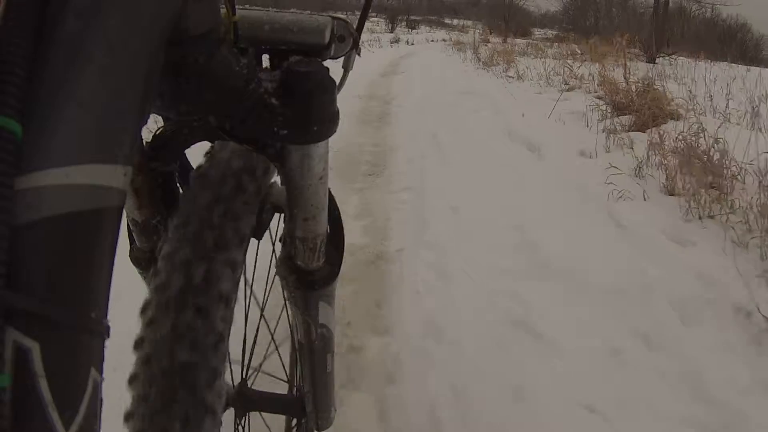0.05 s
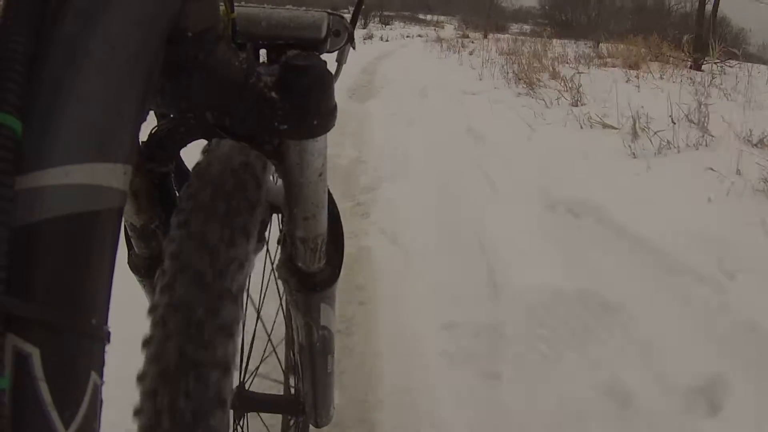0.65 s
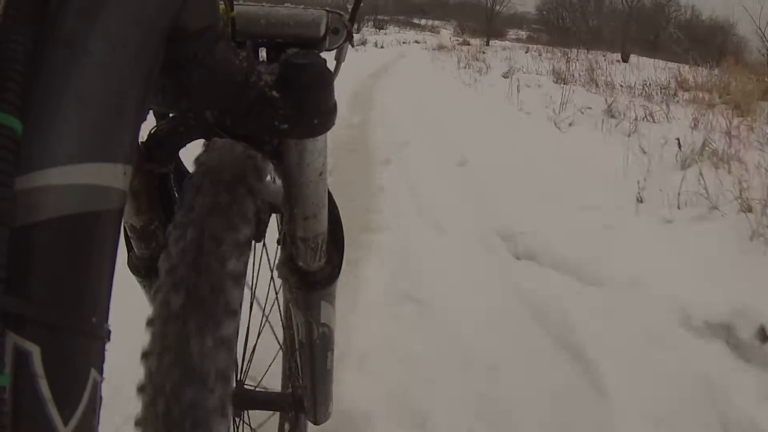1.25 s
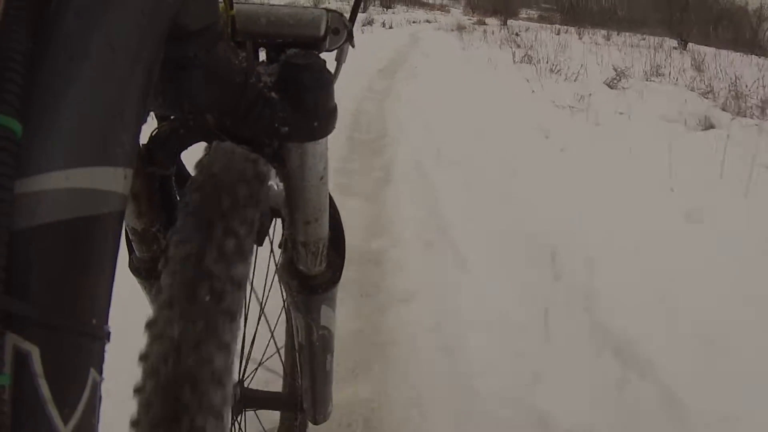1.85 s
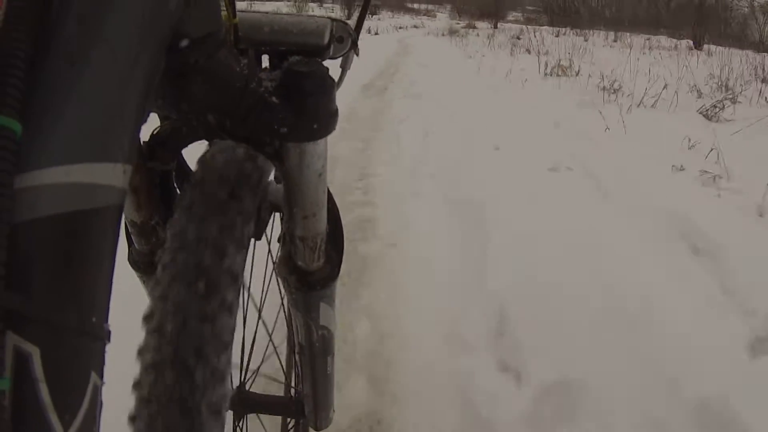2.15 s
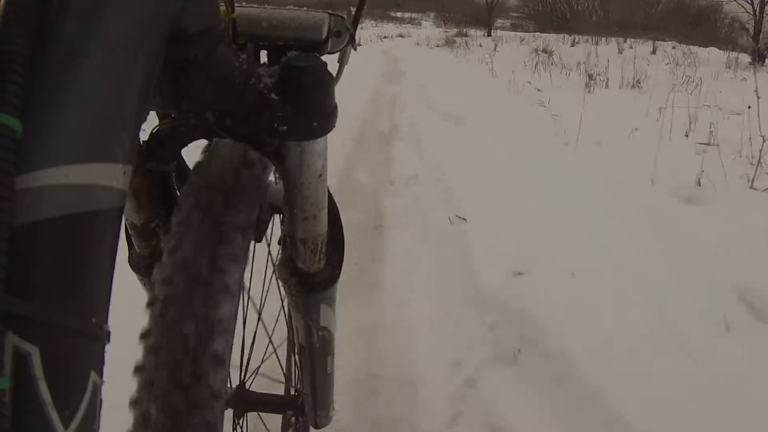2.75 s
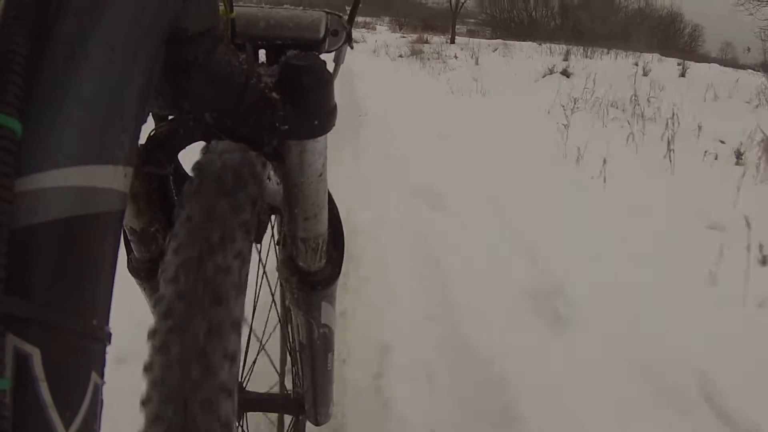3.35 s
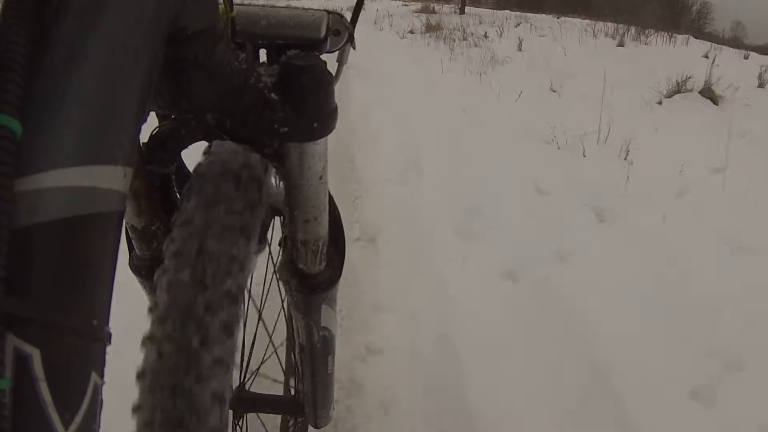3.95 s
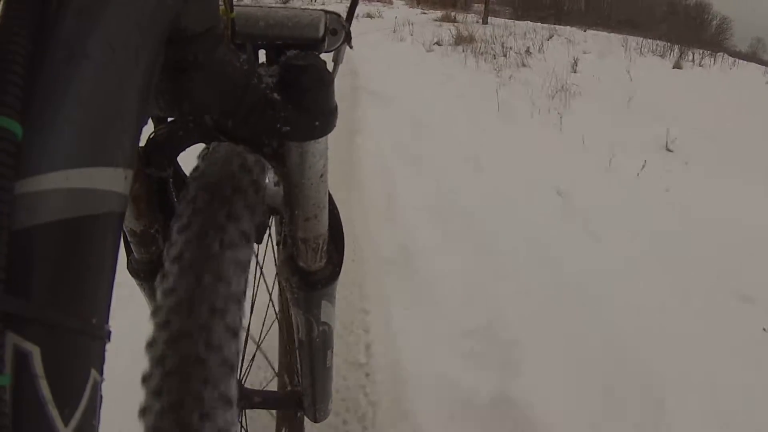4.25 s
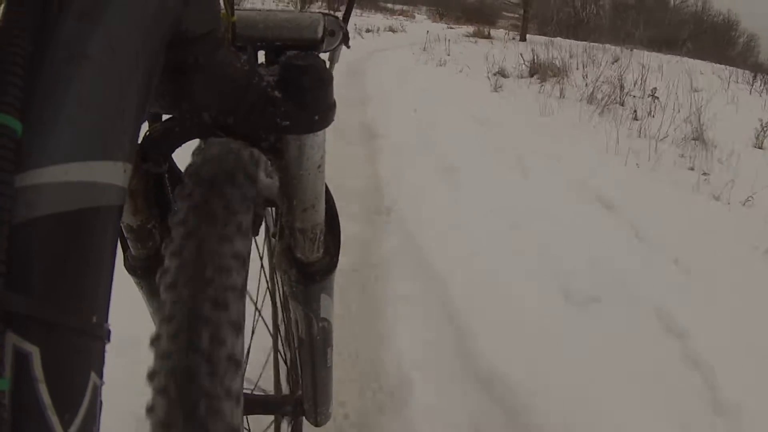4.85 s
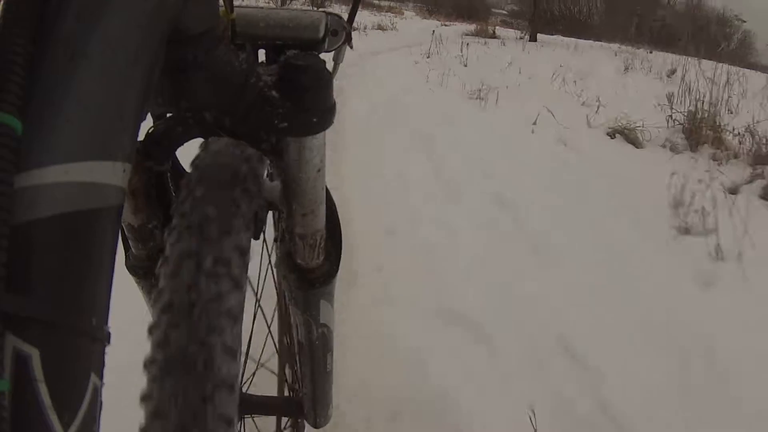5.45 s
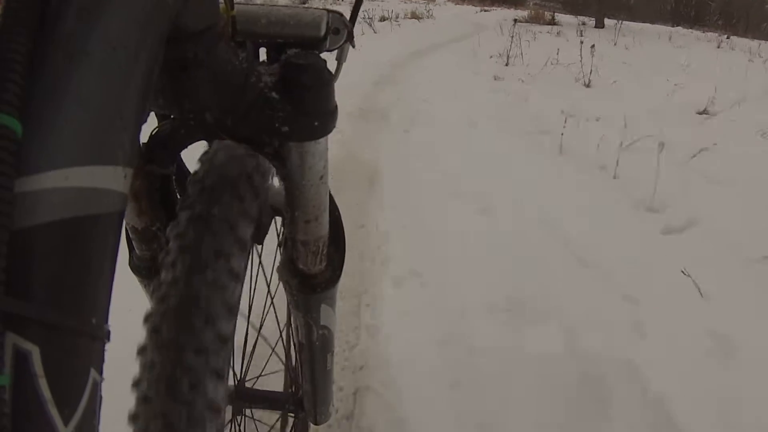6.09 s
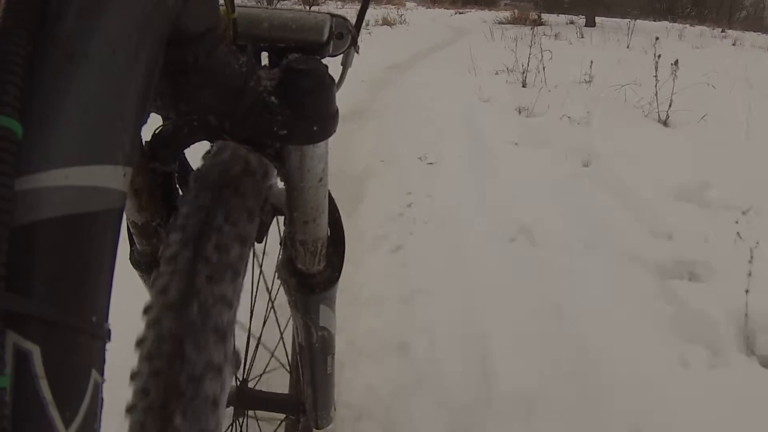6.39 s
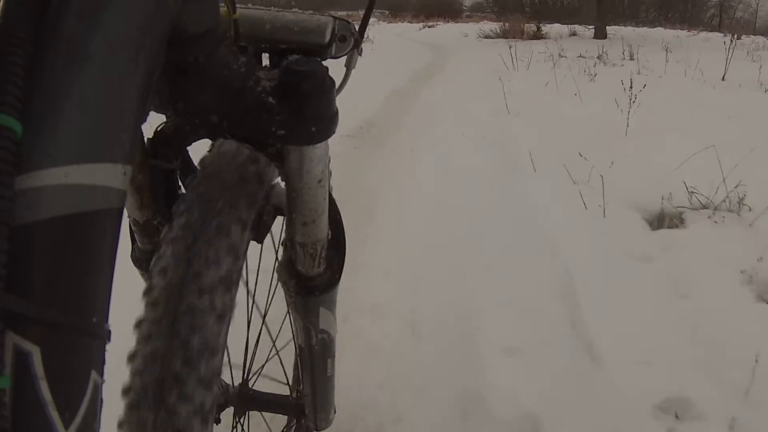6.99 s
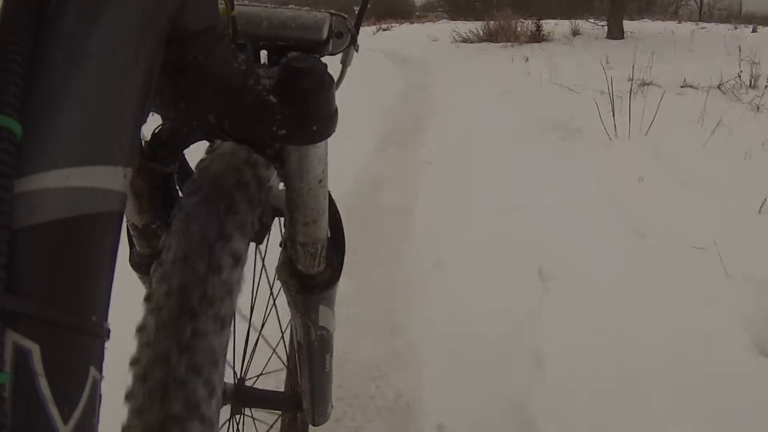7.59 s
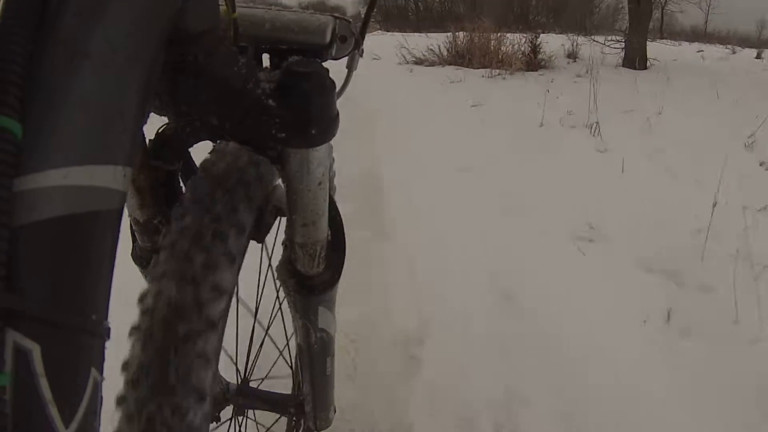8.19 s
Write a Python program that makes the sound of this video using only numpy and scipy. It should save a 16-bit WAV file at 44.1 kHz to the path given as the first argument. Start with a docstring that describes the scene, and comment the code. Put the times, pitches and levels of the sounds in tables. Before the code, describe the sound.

A mountain bike rides along a packed snow trail, heard from a camera in a plastic case clamped to it. A deep rumble and a wavering tyre hum run throughout under a soft crunch of snow. Each rough patch brings a low shudder and a bright chatter of clicks from the mount. A loose part clinks faintly, the case snaps sharply past the middle, and the bike knocks once near the end.

```python
"""A mountain bike's frame shudders on its tyres along a packed snow trail, heard at a camera in a
plastic case clamped to it. Each swing makes the mount stick and slip in a chatter of clicks.
The tread hums, lumps thud through the frame, and breaking snow crunches and rings the case.
The case snaps twice, the bike knocks once and a loose part clinks."""
import sys
import numpy as np
from scipy import signal
from scipy.fft import rfft, irfft, next_fast_len
from scipy.io import wavfile
from scipy.ndimage import uniform_filter1d, map_coordinates

SR = 44100
rng = np.random.default_rng(int(sys.argv[2]) if len(sys.argv) > 2 else 0)


def log_audio(samples):
    """Write samples as a 16-bit WAV file to the path given in sys.argv[1]."""
    # one column per channel
    frames = np.atleast_2d(samples).T
    # limit to full scale, then quantise
    limited = np.clip(frames, -1, 1)
    pcm = np.round(limited * 32767).astype(np.int16)
    wavfile.write(sys.argv[1], SR, pcm)


N = 362943

# rough stretches of trail (time [s], length [s], shudder level [dB], chatter level [dB])
ROUGH_STRETCHES = [(0.099, 0.13, -8, -42.5), (0.33, 0.15, -11, -44), (0.559, 0.2, -14, -44),
                   (0.793, 0.19, -10.5, -43.0), (1.023, 0.11, -13.0, -46.5), (1.168, 0.4, -10, -43.5),
                   (1.615, 0.2, -9.5, -43), (1.833, 0.23, -11.0, -43), (1.974, 0.28, -4.5, -41.5),
                   (2.355, 0.04, -13, -43.5), (2.57, 0.27, -11.0, -43), (3.042, 0.18, -14, -48),
                   (3.406, 0.068, -34, -42), (3.713, 0.19, -15, -48.5), (3.92, 0.22, -18, -45.5),
                   (4.379, 0.11, -10.5, -46), (4.527, 0.25, -7.5, -42), (4.783, 0.24, -8.5, -43.5),
                   (5.066, 0.13, -11.5, -44), (5.344, 0.12, -9, -40), (5.533, 0.306, -9.5, -42.5),
                   (5.91, 0.18, -13.5, -49), (6.162, 0.095, -5, -48.0), (6.537, 0.2, -10.5, -43),
                   (6.776, 0.29, -8.0, -42.5), (7.332, 0.046, -11.5, -46.5), (7.465, 0.075, -15.5, -45.5),
                   (7.621, 0.23, -14.5, -45), (7.86, 0.19, -13, -43.5), (8.13, 0.11, -17.5, -49.5)]
# mount clicks (frequency [Hz], gain [dB])
MOUNT_SPECTRUM = [(1500, -21), (3000, -11.5), (4300, -13.5), (5000, -7), (5400, -7.5), (6050, 2), (6650, 1),
                  (7300, -9.5), (8100, -6), (9200, -14.5), (10800, -10.5), (12200, -19.5), (13300, -33),
                  (15500, -37)]
# hard slips of the mount (time [s], relative level [dB])
HARD_SLIPS = [(0.167, -18), (0.3356, -19.5), (1.1, -15), (1.321, -28), (1.403, -16.5), (1.618, -21),
              (1.717, -18.5), (2.0298, -21), (2.587, -18.5), (2.8486, -21), (3.432, -17), (3.7737, -17.5),
              (3.861, -19.5), (3.929, -24), (4.399, -15.5), (4.564, -15), (4.6113, -14), (5.158, -14.5),
              (5.7747, -16.5), (6.0484, -20.5), (6.698, -26.5), (6.847, -21)]
# tread hum, louder on firm patches (time [s], relative level [dB])
HUM_LEVELS = [(0.0, -38), (0.24, -22.5), (1.33, -24), (1.56, -14.0), (1.72, -25), (2.03, -14.5),
              (2.25, -30), (2.58, -15.5), (2.77, -30.5), (3.05, -17), (3.3, -27.5), (4.75, -26.5),
              (5.43, -12.5), (5.52, -26), (5.97, -19.5), (6.79, -28), (7.75, -20), (8.23, -22)]
# unevenness of the trail (time [s], relative level [dB])
RUMBLE_LEVELS = [(0.0, -36.5), (0.45, -32.5), (0.95, -32.5), (1.45, -35.5), (1.93, -31), (2.18, -37),
                 (2.35, -33), (2.95, -33.5), (3.94, -37), (4.06, -33), (4.87, -34.5), (5.21, -30.5),
                 (5.45, -34.5), (6.71, -33), (7.0, -35), (7.85, -29.0), (8.11, -33.5), (8.23, -26.5)]
# frame rumble (frequency [Hz], relative gain [dB])
RUMBLE_SPECTRUM = [(35, -30.5), (55, 1), (75, 0.5), (125, -2), (170, -5), (218, -2.5), (250, -16),
                   (290, -7), (350, -21.5), (460, -19), (560, -39.5), (750, -41), (1200, -111)]
# tyres pressing the snow (time [s], relative level [dB])
CRUNCH_LEVELS = [(0.0, -49.5), (0.2, -46), (1.05, -48.0), (1.63, -51.0), (1.99, -43.5), (2.21, -51.0),
                 (2.72, -46.5), (3.73, -51.0), (4.45, -50.0), (4.57, -49), (5.21, -46), (5.63, -48),
                 (6.04, -50.5), (6.66, -47), (6.85, -50.5), (7.45, -48.5), (7.88, -42.5), (8.23, -46.5)]
# breaking snow (frequency [Hz], relative gain [dB])
FIZZ_SPECTRUM = [(400, -6), (1500, -7.5), (3200, -4), (3900, 8), (5000, 2), (5700, -6), (10000, -8),
                 (12000, -26), (15500, -19)]
# plastic case (frequency [Hz], width [Hz], relative gain [dB])
CASE_RESONANCES = [(630, 84, -10.5), (805.4, 52, -4.5), (990, 91, -4.5), (1196, 146, 0.5), (1400, 286, 2),
                   (1521, 115, 5.5), (1875, 420, -2.5), (2034, 180, 3), (2507, 227, -3), (2877, 225, -11),
                   (3630, 244, -11.5), (4910, 550, -16)]
# snaps against the case (time [s], level [dB])
CASE_SNAPS = [(3.449, -21), (5.6075, -5.5)]
# snapped case (frequency [Hz], relative level [dB], t60 [s])
CASE_MODES = [(1780, -17, 0.012), (2360, -17, 0.025), (3230, -8, 0.0064), (4020, -11.5, 0.0049),
              (5100, -8.5, 0.0053), (8200, 6, 0.0025), (10600, 2, 0.002), (14100, -13, .003)]
# one knock with rebounds (time [s], level [dB])
FRAME_KNOCKS = [(7.4298, -21.5), (7.4325, -15), (7.4405, -25)]
# knocked frame (frequency [Hz], relative level [dB], t60 [s])
FRAME_MODES = [(355, -1, 0.059), (464, -1, 0.08), (800, -7, 0.12), (970, 0.5, 0.029), (1210, 2.5, 0.035),
               (1530, 1, 0.027), (1790, -5.5, 0.055), (2070, 8.5, 0.029), (2460, -2, 0.032),
               (2900, -4, 0.012)]
# clear clinks of the loose part (time [s], relative level [dB])
PART_CLINKS = [(0.4494, -44), (0.6754, -41), (2.0742, -39), (4.0522, -42), (4.5925, -40), (4.6683, -38),
               (5.1073, -40.5), (7.9064, -41.5)]
# loose part (frequency [Hz], relative level [dB], t60 [s])
PART_MODES = [(1980, 8.5, 0.017), (2460, 8.5, 0.05), (2602, -1.5, 0.02), (2650, -15, .015)]

SHUDDER_ATTACK_S, SHUDDER_DECAY_S, SHUDDER_IDLE_DB = 0.033, 0.031, -23.5
CHATTER_ATTACK_S, CHATTER_DECAY_S, CHATTER_IDLE_DB = 0.008, 0.022, -55
TYRE_TRAVEL = 0.72  # swing limit, full scale 1
BAND_LIMIT_HZ = 15700


def swing_phase(swing_hz, wander_hz):
    """Phase of the frame bouncing on its tyres, jostled by the trail."""
    return 2 * np.pi * np.cumsum(swing_hz + wander_hz * wobble(25)) / SR


def frame_shudder(phase, gain_db, uneven_db, jiggle_db, cutoff_hz):
    """The tyres stiffen at the end of their travel and soften the bounce into a deep flutter."""
    stretches = [(start_s, length_s, db) for start_s, length_s, db, _ in ROUGH_STRETCHES]
    shudder_db = shaking_db(stretches, SHUDDER_ATTACK_S, SHUDDER_DECAY_S, SHUDDER_IDLE_DB)
    bounce = amp(shudder_db + gain_db + uneven_db * wobble(28)) * unit(np.sin(phase))
    # even on smooth snow; drifts in and out of step
    jiggle = amp(jiggle_db) * unit(wobble(22) * np.cos(phase) + wobble(22) * np.sin(phase))
    swing = TYRE_TRAVEL * np.tanh((bounce + jiggle) / TYRE_TRAVEL)
    return filtered(swing, lambda hz: 1 / (1 + (hz / cutoff_hz) ** 8))


def mount_chatter(phase, gain_db, uneven_db, peak_rate_hz, bunching, spread_db, sparkle, sparkle_hz):
    """Tiny stick-slip clicks, densest on rough ground and where each swing is fastest."""
    stretches = [(start_s, length_s, db) for start_s, length_s, _, db in ROUGH_STRETCHES]
    chatter_db = shaking_db(stretches, CHATTER_ATTACK_S, CHATTER_DECAY_S, CHATTER_IDLE_DB)
    # grips on some swings, less under hard shaking
    grip = np.clip(amp(0.3 * (CHATTER_IDLE_DB - chatter_db)), 0, 1)
    chatter_db += uneven_db * grip * (np.tanh(1.5 * wobble(35)) - 0.5)
    speed = np.abs(np.cos(phase + 0.76 * wobble(70)))
    density = amp(0.79 * (chatter_db - chatter_db.max()))
    kicks = grains(peak_rate_hz * density * speed ** bunching, spread_db) / np.sqrt(density)
    clicks = unit(slip_clicks(kicks, scrape=0.44, decay_s=0.014))
    # harder slips are brighter
    treble = filtered(clicks, lambda hz: 1 - 1 / (1 + (hz / sparkle_hz) ** 8))
    treble_gain = amp(sparkle * (chatter_db - np.percentile(chatter_db, 65)))
    return amp(chatter_db + gain_db) * (clicks + (treble_gain - 1) * treble)


def mount_slips(gain_db):
    """On the hardest jolts the mount jumps in one loud click."""
    kicks = np.zeros(N)
    for time_s, db in HARD_SLIPS:
        kicks[round(time_s * SR)] = amp(db)
    return amp(gain_db) * slip_clicks(kicks, scrape=0.62, decay_s=0.01)


def slip_clicks(kicks, scrape, decay_s):
    """Each slip is a sharp click, then a short scrape as the mount grips again."""
    t = np.arange(SR // 20) / SR
    tail = t * amp(-120 * t / decay_s)
    energy = np.abs(signal.fftconvolve(kicks ** 2, tail / tail.sum())[:N])
    return coloured(kicks + scrape * np.sqrt(energy) * grains(6000, spread_db=5), MOUNT_SPECTRUM)


def tread_hum(gain_db, knob_hz, wander_hz, uneven_db):
    """Knobs drum on packed snow: a rough, wavering hum, steadier where loud."""
    hum_db = curve(HUM_LEVELS)
    looseness = np.minimum(1, amp(0.86 * (np.median(hum_db) - hum_db)))
    waver_db = uneven_db * looseness * (np.tanh(wobble(20) + 0.5) - 0.5)
    phase = 2 * np.pi * np.cumsum(knob_hz + wander_hz * wobble(35)) / SR
    return amp(hum_db + gain_db + waver_db) * unit(np.sin(phase) * amp(1.1 * wobble(35)))


def trail_rumble(gain_db, rate_hz, uneven_db):
    """Lumps in the trail thud through the frame."""
    envelope = amp(curve(RUMBLE_LEVELS) + gain_db + uneven_db * wobble(12))
    return envelope * unit(coloured(grains(rate_hz, spread_db=2.5), RUMBLE_SPECTRUM))


def snow_crunch(fizz_db, ring_db, ring_rate_hz, spread_db, clump_db):
    """Crystals break in clumps under the tyres and ring the case."""
    clumps = amp(clump_db * wobble(70) + 1.01 * wobble(9))
    fizz = unit(coloured(clumps * grains(12000, spread_db=-3.5), FIZZ_SPECTRUM))
    ring = unit(resonated(clumps * grains(ring_rate_hz, spread_db), CASE_RESONANCES))
    return amp(curve(CRUNCH_LEVELS)) * (amp(fizz_db) * fizz + amp(ring_db) * ring)


def case_snaps():
    """Sharp blows ring the case's high, short modes."""
    return struck(CASE_SNAPS, CASE_MODES, grit=0.28)


def frame_knock():
    """The bike hits a bump and rebounds, ringing the frame."""
    return struck(FRAME_KNOCKS, FRAME_MODES, grit=1.0)


def part_clinks(gain_db, faint_db, faint_count):
    """A loose part clinks: clearly now and then, faintly at random times."""
    faint = [(when * N / SR, faint_db + 6 * size) for when, size in rng.random((faint_count, 2))]
    return amp(gain_db) * struck(PART_CLINKS + faint, PART_MODES, grit=1.7)


def struck(blows, modes, grit):
    """Each blow rings the modes at new strengths, roughened by noise."""
    out, t = np.zeros(N + SR), np.arange(SR // 8) / SR
    for time_s, db in blows:
        ring = np.zeros(len(t))
        for k, (hz, mode_db, t60_s) in enumerate(modes):
            envelope = amp(mode_db + rng.normal(0, 2) - 60 * t / t60_s)
            ring += (-1) ** k * envelope * np.sin(2 * np.pi * hz * t)
        noise = uniform_filter1d(uniform_filter1d(rng.standard_normal(len(t)), size=40), size=16)
        out[round(time_s * SR):][:len(t)] += amp(db) * ring / np.abs(ring).max() * (1 + grit * noise)
    return out[:N]


def shaking_db(stretches, attack_s, decay_s, idle_db):
    """Level that builds into each rough stretch and dies back to idle."""
    t, gain = np.arange(N) / SR, np.zeros(N)
    for start_s, length_s, db in stretches:
        near = slice(max(int((start_s - 0.2) * SR), 0), int((start_s + length_s + 0.3) * SR))
        age_s = t[near] - start_s
        rise = (1 + np.tanh(age_s / attack_s)) / 2
        fall = (1 + np.tanh((length_s - age_s) / decay_s)) / 2
        gain[near] = np.maximum(gain[near], amp(db) * rise * fall)
    return 20 * np.log10(np.hypot(gain, amp(idle_db)))


def grains(rate_hz, spread_db):
    """Random impulses of uneven size and either sign, at rms 1."""
    fires = rng.random(N) < rate_hz / SR
    sizes = amp(spread_db * np.clip(rng.standard_normal(N), -2, 2))
    return unit(fires * sizes * np.sign(rng.standard_normal(N)))


def wobble(rate_hz):
    """Smooth curve through random knots."""
    knots = rng.standard_normal(int(N * rate_hz / SR) + 4)
    return map_coordinates(knots, [np.arange(N) * rate_hz / SR])


def curve(points):
    """Timed levels, interpolated per sample."""
    time_s, db = np.transpose(points)
    return np.interp(np.arange(N) / SR, time_s, db)


def coloured(x, spectrum):
    """x shaped by a spectrum, interpolated in log frequency."""
    points_hz, db = np.transpose(spectrum)
    return causal(x, lambda hz: amp(np.interp(np.log(hz + 1), np.log(points_hz), db)))


def resonated(x, resonances):
    """x through steep-sided resonances."""
    def gain(hz):
        peaks = (amp(db) / (1 + (2 * (hz - centre_hz) / width_hz) ** 2)
                 for centre_hz, width_hz, db in resonances)
        return np.sqrt(sum(peak ** 2 for peak in peaks))
    return causal(x, gain)


def causal(x, gain):
    """x through a minimum-phase filter of magnitude gain(hz)."""
    def response(hz):
        cepstrum = irfft(np.log(np.maximum(gain(hz), 1e-6)))
        cepstrum[1:len(hz) - 1] *= 2
        cepstrum[len(hz):] = 0
        return np.exp(rfft(cepstrum))
    return filtered(x, response)


def filtered(x, response):
    """x through a complex response(hz)."""
    size = 2 * next_fast_len(N // 2 + SR // 4)
    return irfft(rfft(x, size) * response(np.fft.rfftfreq(size, 1 / SR)), size)[:N]


def amp(db):
    """Decibels to gain."""
    return 10 ** (np.asarray(db) / 20)


def unit(x):
    """x at rms 1."""
    return x / np.sqrt(np.mean(x ** 2) + 1e-20)


def scene():
    """Mono mix at the camera; one swing phase drives frame and mount."""
    phase = swing_phase(swing_hz=31.37, wander_hz=4)
    mix = frame_shudder(phase, gain_db=0.5, uneven_db=1.5, jiggle_db=-23, cutoff_hz=38)
    mix += tread_hum(gain_db=-3.5, knob_hz=100.04, wander_hz=4.2, uneven_db=9.0)
    mix += trail_rumble(gain_db=1.76, rate_hz=900, uneven_db=0.96)
    mix += snow_crunch(fizz_db=-10.0, ring_db=2.5, ring_rate_hz=1600, spread_db=1.5, clump_db=1.7)
    mix += mount_chatter(phase, gain_db=0.5, uneven_db=4.5, peak_rate_hz=3500, bunching=5.2,
                         spread_db=6, sparkle=0.39, sparkle_hz=9600)
    mix += mount_slips(gain_db=15.0)
    mix += case_snaps() + frame_knock()
    mix += part_clinks(gain_db=8.5, faint_db=-56, faint_count=30)
    return mix[None]


def record(dry):
    """Brick-wall low-pass at the camera's band limit."""
    return filtered(dry[0], lambda hz: hz < BAND_LIMIT_HZ)[None]


dry = scene()
out = record(dry)
log_audio(out)
```